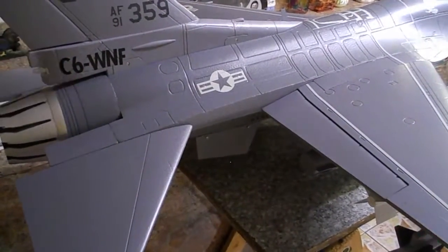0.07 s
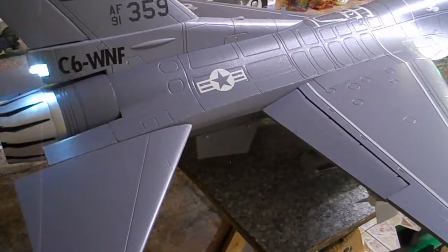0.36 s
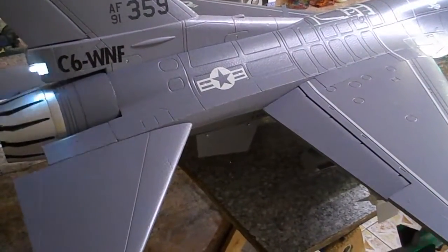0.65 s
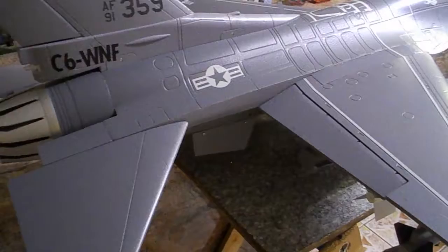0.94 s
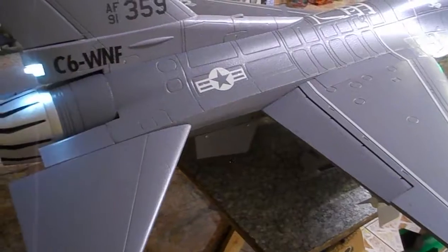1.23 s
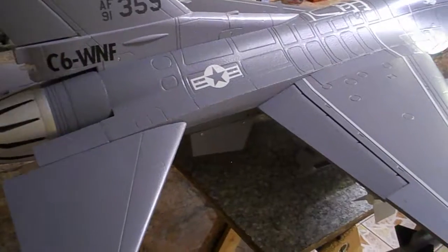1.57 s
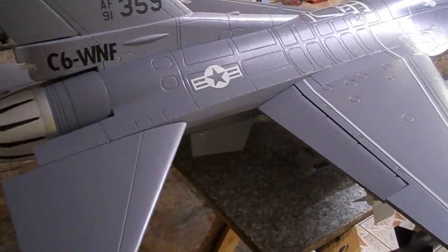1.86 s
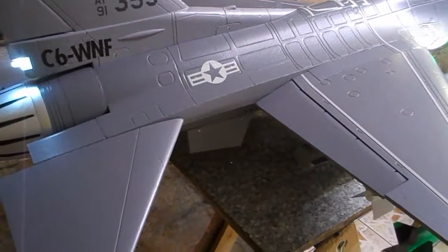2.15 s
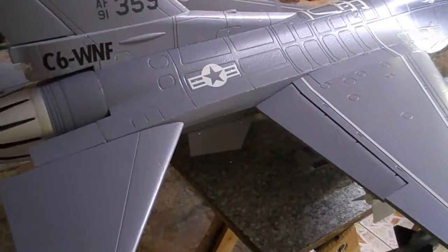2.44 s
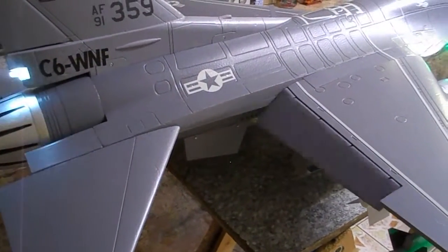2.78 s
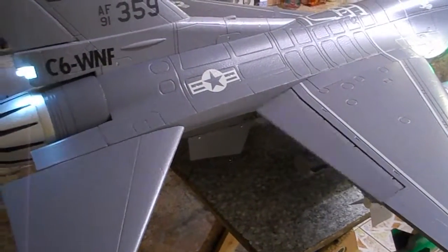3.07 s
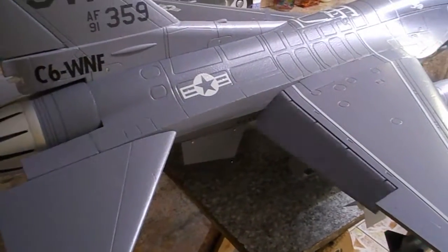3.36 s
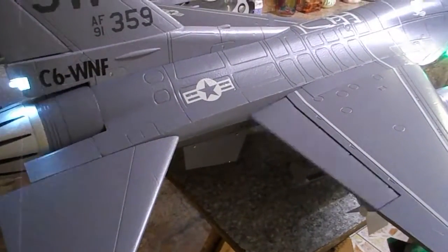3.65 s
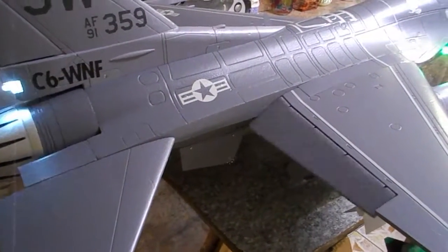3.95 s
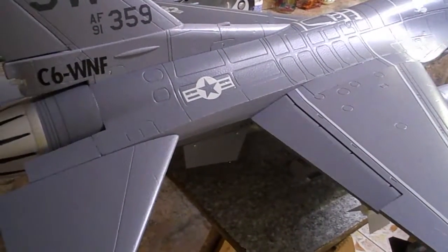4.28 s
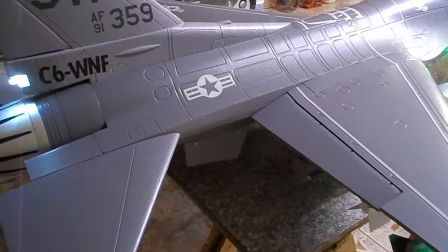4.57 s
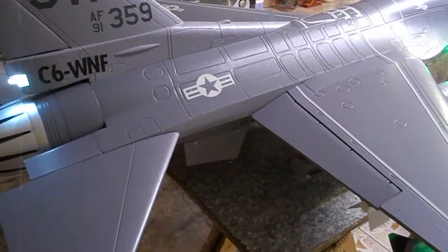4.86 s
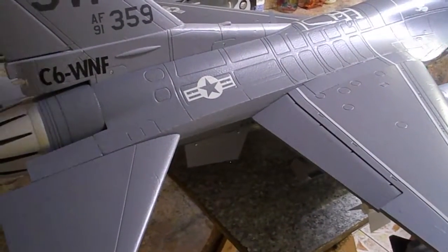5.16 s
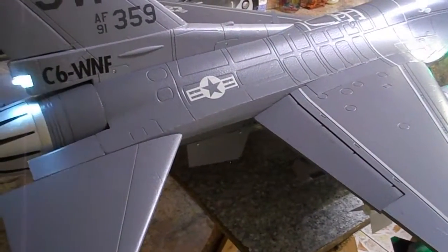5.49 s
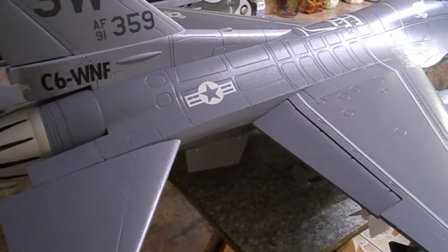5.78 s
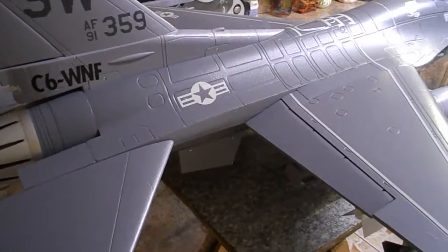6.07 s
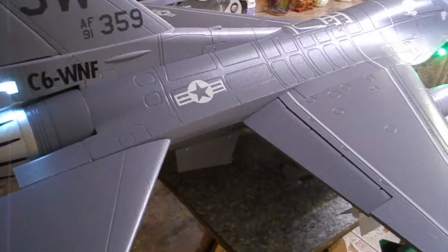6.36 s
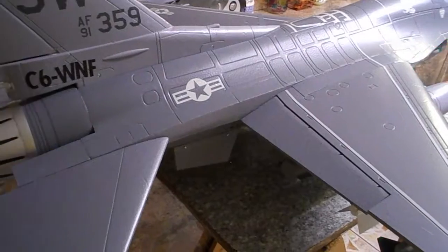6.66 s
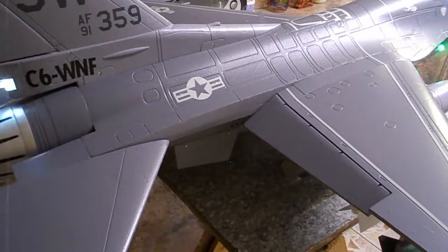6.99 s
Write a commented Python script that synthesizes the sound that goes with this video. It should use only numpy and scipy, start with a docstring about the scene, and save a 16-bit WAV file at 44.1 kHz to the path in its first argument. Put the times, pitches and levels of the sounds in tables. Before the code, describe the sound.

A faint, steady high whine from a model jet's servos runs throughout over soft room hiss, heard by one close microphone in a small, quiet workshop. In the first 0.6 seconds the gears give about eight light, rapid ticks, with a small pushrod click among them. At about 2.5 seconds come a soft knock and a brief hinge creak. From 2.8 to 4.3 seconds a servo drives a control surface back and forth in six quick, loud strokes, each speeding up and braking, with a buzzing growl, a gear whir and a bright rattle. Two small ticking twitches follow at about 4.6 seconds, then only the whine and hiss remain. At about 6.7 seconds a pushrod snaps sharply, with a hollow thud in the airframe. A few short whirring nudges and lighter clacks follow between 6.8 and 7.1 seconds.

```python
"""A small, quiet workshop, one mono microphone close to the servos of a model jet.
Short nudges knock the gears and ring the servo case; a pushrod clacks across its slack and thuds in the
hollow airframe. A hinge creaks, then the motor drives a control surface through six full strokes,
growling, whirring and rattling. A few more nudges and clacks follow. Underneath, the servos whine
faintly as they hold position, over soft room tone."""
import sys
import numpy as np
from scipy import signal
from scipy.fft import rfft, irfft
from scipy.io import wavfile

SR = 44100
rng = np.random.default_rng(int(sys.argv[2]) if len(sys.argv) > 2 else 0)


def unload_wav(signal):
    """Save mono or channel-first audio to the path in sys.argv[1] as 16-bit WAV at rate SR, clipped to [-1, 1]."""
    wavfile.write(
        sys.argv[1],
        SR,
        np.round(np.clip(np.atleast_2d(signal).T, -1, 1) * 32767).astype(np.int16),
    )


N = 314193
TIME = np.arange(N) / SR


def undb(db):
    """Decibels to gain."""
    return 10 ** (np.asarray(db) / 20)


def unit(x):
    """Scale to rms 1."""
    return x / np.sqrt(np.mean(x ** 2))


def unit_energy(x):
    """Scale a response so that it passes white noise at gain 1."""
    return x / np.sqrt(np.sum(x ** 2))


def through(x, response):
    """Pass a sound through an impulse response."""
    return signal.fftconvolve(x, response)[:N]


def walk(rate):
    """Random drift with rate new values a second and a spread near 1."""
    return np.interp(TIME * rate, np.arange(N), rng.standard_normal(N))


def arch(start, length):
    """Half a sine: a swell from nothing to 1 and back."""
    return np.sin(np.pi * np.clip((TIME - start) / length, 0, 1)).clip(0)


def turns(hz, wobble):
    """Running count of cycles at a wavering rate."""
    return np.cumsum(hz * (1 + wobble * walk(rate=100))) / SR


def colour(points, size=4096):
    """Minimum-phase response with the given spectrum, rolling off below its first point."""
    hz, db = np.transpose(points)
    f = np.maximum(np.arange(size // 2 + 1) * SR / size, 1)
    gain = undb(np.interp(np.log(f), np.log(hz), db)) * np.minimum(f / hz[0], 1) ** 2
    cepstrum = irfft(np.log(gain))
    cepstrum[1:size // 2] *= 2
    cepstrum[size // 2 + 1:] = 0
    return unit_energy(irfft(np.exp(rfft(cepstrum))))


def ring(modes):
    """Response of a few damped resonances; the wider ones die sooner."""
    t = TIME[:SR // 2]
    motion = sum(undb(db) * width / hz * np.exp(-np.pi * width * t) * np.sin(2 * np.pi * hz * t)
                 for hz, width, db in modes)
    return unit_energy(np.diff(motion))


def contacts(phase, scatter_db, decay_s):
    """A scrape of uneven strength at each wrap of a phase, dying quickly."""
    wraps = np.diff(np.floor(phase), prepend=0) > 0
    sizes = wraps * undb(scatter_db * np.clip(rng.standard_normal(N), -2, 2))
    envelope = signal.lfilter([1], [1, -np.exp(-1 / (decay_s * SR))], sizes)
    return unit(envelope * rng.standard_normal(N))


def room(x, wet_db, low_t60_s=0.35, high_t60_s=0.21):
    """At the microphone: direct sound, then the workshop's dense echoes, whose treble dies first."""
    t = TIME[:SR // 2]
    noise = rng.standard_normal(len(t))
    low = signal.sosfilt(signal.butter(1, 3000, fs=SR, output="sos"), noise)
    tail = low * undb(-60 * t / low_t60_s) + (noise - low) * undb(-60 * t / high_t60_s)
    build_up = np.clip(t / 0.0014 - 1, 0, 1)
    response = undb(wet_db) * unit_energy(tail * build_up)
    response[0] = 1  # the direct path
    return through(x, unit_energy(response))


# Spectrum of the workshop's air: (frequency [Hz], relative level [dB])
AIR_SPECTRUM = [(30, -36), (70, -17.5), (140, -13.5), (220, -4.5), (420, 0), (650, -0.5), (1200, -5),
                (2300, -10), (5500, -15), (6900, -13.5), (8000, -17), (16000, -20)]
def room_tone():
    """The soft, steady hiss of the room around the microphone."""
    return undb(-61.35) * unit(through(rng.standard_normal(N), colour(AIR_SPECTRUM)))


# Overtones of the servos' 59 Hz command rate: (frequency [Hz], rms level [dB])
WHINE_LINES = [(473.7, -75.5), (1061, -77.5), (2003, -85.5), (2180, -85), (2826, -87.5), (2885, -80),
               (2945, -69), (3004, -85), (3413, -84.5), (3591, -84.5), (3650, -84), (3709, -82),
               (4474, -82.5), (4533, -82)]
def holding_whine():
    """Servos holding position whine, faint even this close; the weaker lines swell and fade."""
    loudest_db = max(db for hz, db in WHINE_LINES)
    whine = 0
    for hz, db in WHINE_LINES:
        swell_db = 0.12 * (loudest_db - db) * walk(rate=2.4)
        phase = turns(hz, wobble=0.00044) + rng.random()
        whine += undb(db + swell_db) * np.sqrt(2) * np.sin(2 * np.pi * phase)
    return whine


# Spectra of drive knocks, meshing gears and slack teeth: (frequency [Hz], relative level [dB])
KNOCK_SPECTRUM = [(600, -32), (1200, -16.5), (2100, -8), (2700, 3), (3700, -7), (4500, -3), (6200, -7),
                  (7700, -1.5), (9000, -10), (12300, -10.5), (16000, -21)]
WHIR_SPECTRUM = [(230, -30.5), (500, -16), (680, -4), (1500, -3), (1900, -0.5), (2300, -3.5), (3500, -3),
                 (4500, 0.5), (5300, 2.5), (6000, -4), (7500, -6), (12500, -8), (14300, -6), (16000, -8)]
RATTLE_SPECTRUM = [(1500, -17.5), (2200, -14), (2650, 0), (3400, -26), (5800, -6.5), (6700, 3.5),
                   (8000, 2.5), (10000, 1), (12000, -2), (13500, -7), (16000, -22)]
# The servo case in its wooden mount: (frequency [Hz], width [Hz], relative level [dB])
CASE_MODES = [(620, 130, 1.5), (1160, 530, 4), (1900, 270, -2.5), (2600, 350, 9.5), (3360, 380, 0),
              (4500, 570, -12)]
# Short moves, at relative levels: (time [s], length [s], knocks [dB], whir [dB], case ring [dB])
NUDGE_MOVES = [ (-.012, .033, -54, -57, -48.5), (0.052, 0.032, -48.5, -63, -50),
               (.128, 0.024, -45, -56, -50), (.212, 0.039, -52.5, -49, -47), (0.301, .027, -47.5, -58, -55),
               (0.393, 0.017, -44.5, -51, -50), (0.482, 0.023, -47, -54, -50),
               (.569, 0.02, -48.5, -60, -53), (4.582, 0.041, -52, -49, -38), (4.641, 0.037, -48, -42, -38),
               (6.804, 0.028, -47, -35, -44), (6.817, 0.065, -40, -23.5, -41),
               (6.931, 0.028, -37.5, -36, -40), (7.022, 0.04, -44.5, -34.5, -45.5), ]
def nudges(drive_hz=302.6):
    """Each drive pulse knocks the gears; as the motor gets going they whir and ring the case."""
    knock_gain, whir_gain, case_gain, pulse_count = np.zeros((4, N))
    for start, length, knock_db, whir_db, case_db in NUDGE_MOVES:
        age = np.clip(TIME - start, 0, length)
        speed = arch(start, length)
        knock_gain += undb(knock_db) * (age > 0) * (age < length) * (1 + 0.16 * speed)
        whir_gain += undb(whir_db) * speed
        case_gain += undb(case_db) * speed
        pulse_count += np.ceil(age * drive_hz)  # the first pulse comes at once
    pulses = contacts(pulse_count, scatter_db=2.5, decay_s=0.00085)
    teeth = contacts(turns(900, wobble=0.2), scatter_db=2.5, decay_s=0.0022)
    knocks = undb(-10.5) * through(pulses, colour(KNOCK_SPECTRUM)) * knock_gain
    mesh = through(teeth, colour(WHIR_SPECTRUM))
    rattle = through(teeth, colour(RATTLE_SPECTRUM))
    whir = (undb(-9.5) * mesh + undb(-11) * rattle) * whir_gain
    case = undb(-1.5) * unit(through(mesh, ring(CASE_MODES))) * case_gain
    return room(knocks, wet_db=-0.5) + room(whir + case, wet_db=1.5)


# Ring of the metal linkage and of the airframe: (frequency [Hz], width [Hz], relative level [dB])
LINKAGE_MODES = [(5000, 360, 3), (5460, 630, -3), (7600, 1400, 0), (9100, 410, -21), (11500, 800, -2),
                 (14200, 1100, -5)]
AIRFRAME_MODES = [(247, 18, 5), (356, 27, -6)]
# Spectrum of the airframe's thud: (frequency [Hz], relative level [dB])
THUD_SPECTRUM = [(170, -29), (290, 1.5), (550, -9), (1200, 1.5), (2700, 3.5), (4000, -3.5), (9000, -4)]
# Pushrod jumps, at relative levels: (time [s], snap [dB], thud [dB])
PUSHROD_JUMPS = [(0.055, -9, -36), (2.485, -30, -18), (2.591, -17.5, -48), (6.6545, 10, 2), (6.661, -5, -8),
                 (6.802, -5, -20), (7.018, -10, -40)]
def linkage_clacks():
    """A pushrod jumps across its slack: a close, bright snap, and a roomier thud in the airframe."""
    snaps, blows = np.zeros((2, N))
    for start, snap_db, thud_db in PUSHROD_JUMPS:
        age = np.maximum(TIME - start, 0)
        burst = age * np.exp(-age / 0.00097) * rng.standard_normal(N)
        snaps += undb(snap_db) * unit_energy(burst)
        blows[int((start + 0.001) * SR)] += undb(thud_db)  # the shell answers a moment later
    metal = undb(-11.5) * through(snaps, ring(LINKAGE_MODES))
    thud = through(blows, colour(THUD_SPECTRUM))
    body = undb(-8) * thud + undb(-23) * through(thud, ring(AIRFRAME_MODES))
    return room(metal, wet_db=-5) + room(body, wet_db=5.5)


# Spectrum of the rubbing hinge: (frequency [Hz], relative level [dB])
HINGE_SPECTRUM = [(500, -6.5), (1800, -12), (2600, 3.5), (3400, -0.5), (4600, -9), (8000, -19),
                  (15000, -18)]
# Soft creaks: (time [s], length [s], level [dB])
HINGE_CREAKS = [(2.475, 0.052, -49), (2.524, 0.067, -57.5)]
def hinge_creak():
    """A hinge sticks and slips as a control surface settles."""
    slips = contacts(turns(500, wobble=0.2), scatter_db=2.5, decay_s=0.0015)
    pressure = sum(undb(db) * arch(start, length) for start, length, db in HINGE_CREAKS)
    return room(through(slips, colour(HINGE_SPECTRUM)) * pressure, wet_db=-1)


# Strokes to and fro, at relative levels: (time [s], driven for [s], gear take-up [s],
# target speed [Hz], growl [dB], whir [dB], rattle [dB], rattle drift [dB/s])
FULL_STROKES = [ (2.796, 0.15, 0.015, 302.6, -41.5, -33.5, -28, 1),
                (3.033, 0.22, 0.027, 319.8, -34, -34, -31, -24),
                (3.312, 0.21, 0.016, 352.4, -37, -34, -30, 15),
                (3.618, 0.24, 0.018, 345.2, -36, -33, -30.5, -17),
                (3.932, 0.19, 0.0092, 352, -35.5, -34, -28, 2), (4.126, 0.1, .01, 324, -32, -32.5, -34, 22),
                ]
def stroke_motion(crawl_hz=218.1, spin_up_s=0.16, brake_hz_per_s=850):
    """Motor speed and levels as each stroke takes up the gears, spins up from a crawl, then brakes."""
    table = np.array(FULL_STROKES)
    current = np.maximum(np.searchsorted(table[:, 0], TIME) - 1, 0)
    start, driven, take_up, target_hz, growl_db, whir_db, rattle_db, drift = table[current].T
    age = np.maximum(TIME - start, 0)
    braking_s = np.maximum(age - driven, 0)
    spin_up = np.sin(np.pi / 2 * np.minimum(age / spin_up_s, 1))
    driven_hz = crawl_hz + (target_hz - crawl_hz) * spin_up
    speed_hz = np.maximum(driven_hz - brake_hz_per_s * braking_s, crawl_hz)
    growl_db -= 0.22 * np.maximum(308.6 - speed_hz, 0)  # a slow motor growls less
    rattle_db += drift * np.minimum(age, driven)
    # under braking each sound dies at its own rate, in dB a second
    growl_db -= 260 * braking_s
    whir_db -= 203 * braking_s
    rattle_db -= 330 * braking_s
    meshed = 1 - np.exp(-age / take_up)
    return speed_hz, growl_db, whir_db, rattle_db, meshed


def backlash(shaft, gain, slams_per_s=70):
    """Slack teeth chatter twice a turn; at random one slams across its whole play."""
    slam_count = np.cumsum(rng.random(N) < slams_per_s / SR)
    slams = undb(-9.5) * contacts(slam_count, scatter_db=2, decay_s=0.0002)
    chatter = undb(-3) * contacts(2 * shaft, scatter_db=4, decay_s=0.00074)
    loose = room(chatter * gain, wet_db=-3) + room(slams * gain, wet_db=4)
    return through(loose, colour(RATTLE_SPECTRUM))


# Motor tone: (harmonic [multiple of the turn rate], relative level [dB])
MOTOR_HARMONICS = [(2, -13), (3, 8), (4, 1)]
# Wing skin, shaken by the motor: (frequency [Hz], width [Hz], relative level [dB])
SKIN_MODES = [(908, 46, 1), (1035, 80, 1.5), (1176, 93, -1)]
def servo_strokes():
    """Close to the microphone, the motor growls in the wing skin while its gears whir and rattle."""
    speed_hz, growl_db, whir_db, rattle_db, meshed = stroke_motion()
    shaft = turns(speed_hz, wobble=0.035)
    tone = unit(sum(undb(db) * np.sin(2 * np.pi * (k * shaft + rng.random()))
                    for k, db in MOTOR_HARMONICS))
    # a three-pole motor jerks the gears three times a turn
    teeth = through(contacts(3 * shaft, scatter_db=0.5, decay_s=0.001), colour(WHIR_SPECTRUM))
    tone *= 1 + 0.42 * walk(rate=260)  # the load changes from tooth to tooth
    skin = unit(through(teeth, ring(SKIN_MODES)))
    growl = (undb(-7.5) * tone + undb(-8.5) * skin) * undb(growl_db) * meshed
    # the rotor's unbalance hums once a turn, but only a fast rotor shakes the airframe
    shake = np.clip((speed_hz - 245) / 35, 0, 1) * undb(3.5 * walk(rate=35))
    hum = np.sin(2 * np.pi * shaft) * shake
    whir = (undb(0.5) * teeth + undb(-24) * hum) * undb(whir_db) * meshed
    # the rattle comes in fully only where it stands out from the smooth whir
    slack = np.clip(1.5 + (rattle_db - whir_db - 5.5) / 7, 0.1, 1)
    rattle = backlash(shaft, gain=slack * undb(rattle_db) * meshed)
    return room(growl + whir, wet_db=-6) + rattle


def scene():
    """Everything at the one microphone, the same in both channels."""
    mono = room_tone() + holding_whine() + nudges() + linkage_clacks() + hinge_creak() + servo_strokes()
    return np.tile(mono, (2, 1))


def record(dry, notch_hz=8580, top_hz=15800):
    """The recorder has a narrow notch in the treble and cuts the top."""
    notched = signal.lfilter(*signal.iirnotch(notch_hz, Q=17.5, fs=SR), dry)
    return signal.sosfilt(signal.ellip(10, 0.2, 80, top_hz, fs=SR, output="sos"), notched)


dry = scene()
out = record(dry)
unload_wav(out)
```